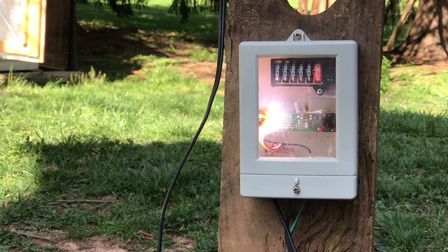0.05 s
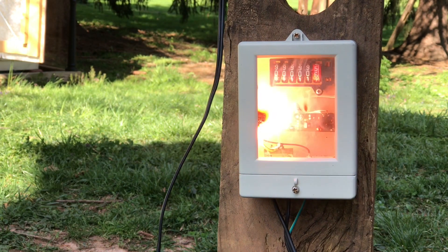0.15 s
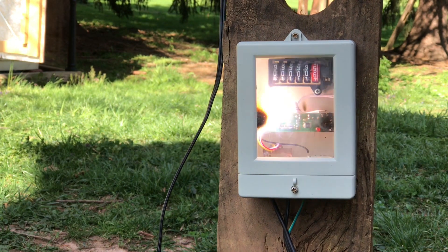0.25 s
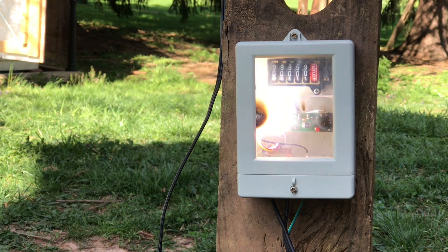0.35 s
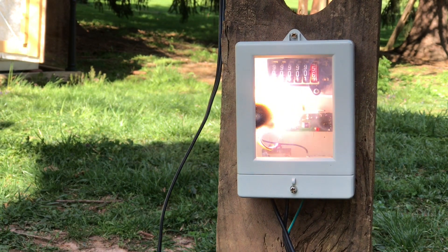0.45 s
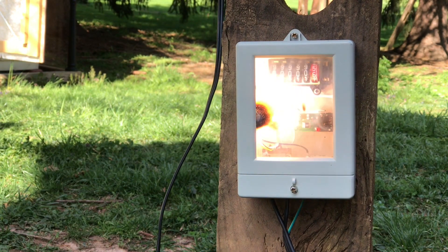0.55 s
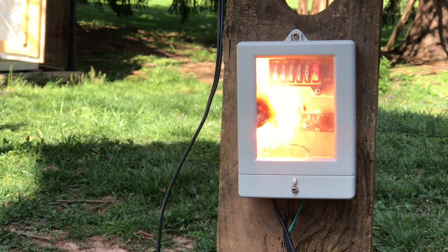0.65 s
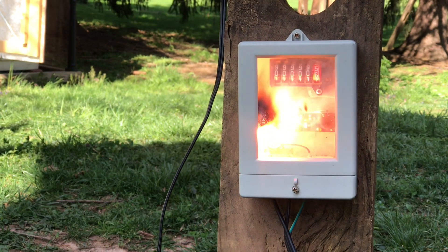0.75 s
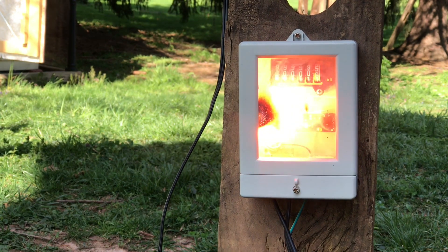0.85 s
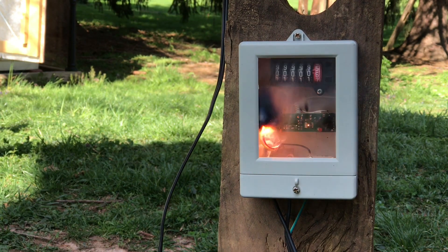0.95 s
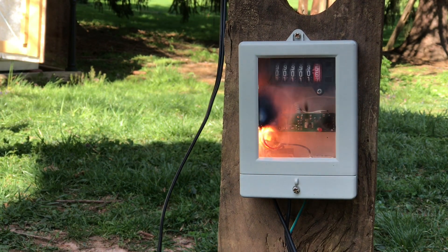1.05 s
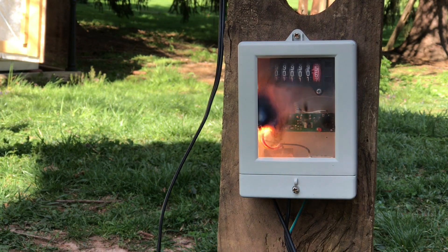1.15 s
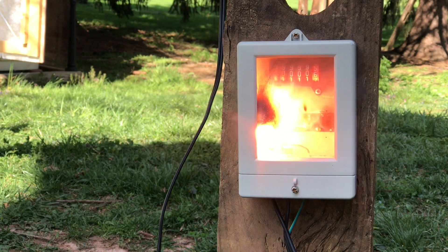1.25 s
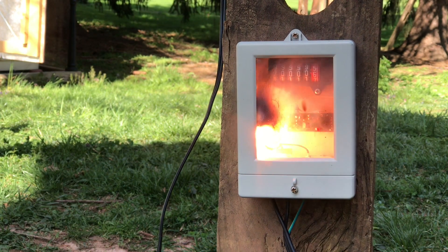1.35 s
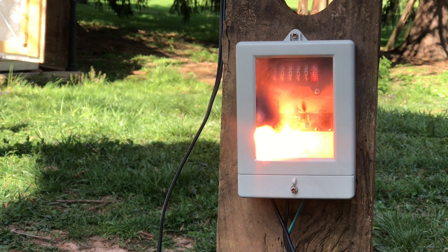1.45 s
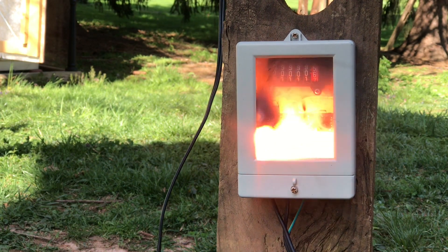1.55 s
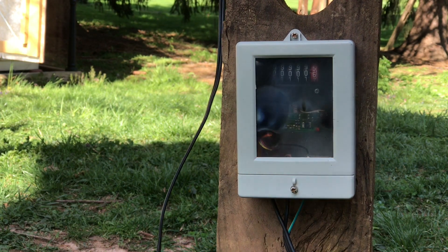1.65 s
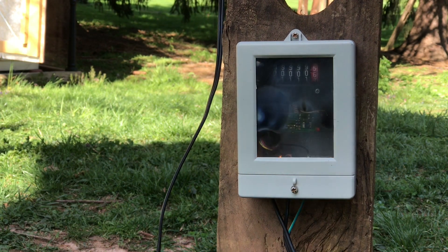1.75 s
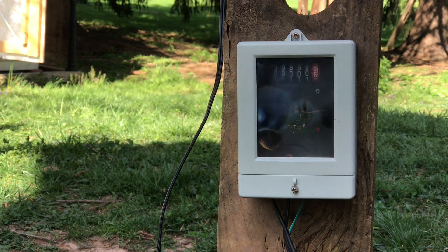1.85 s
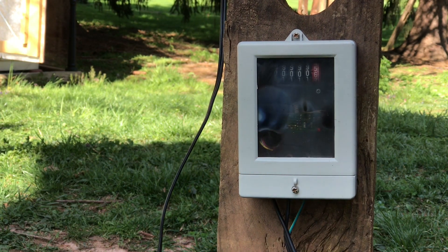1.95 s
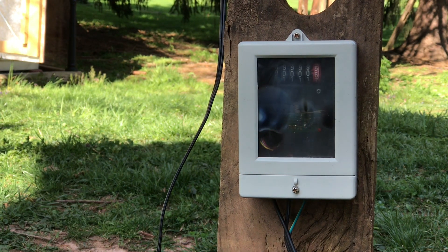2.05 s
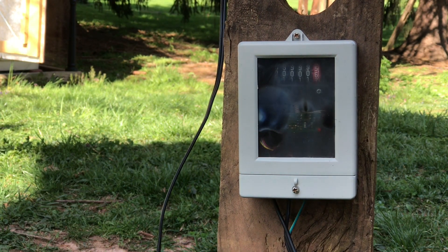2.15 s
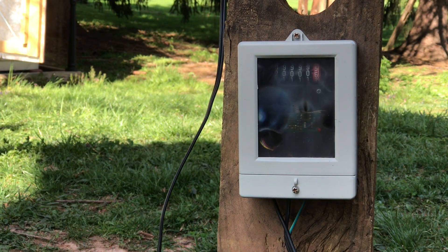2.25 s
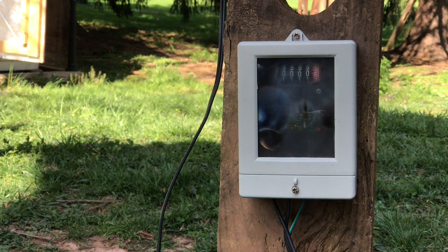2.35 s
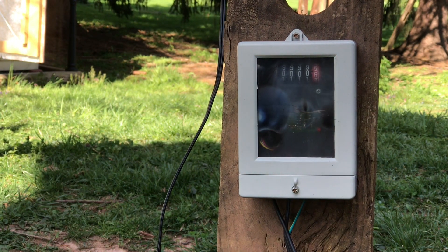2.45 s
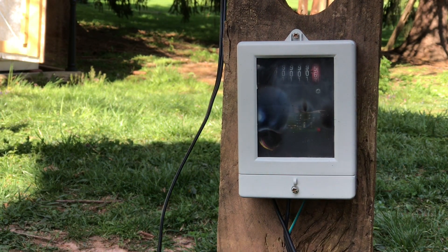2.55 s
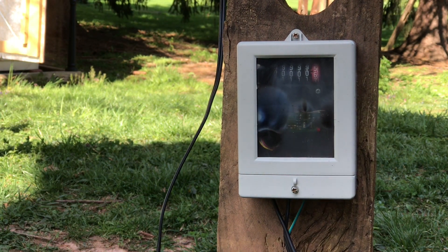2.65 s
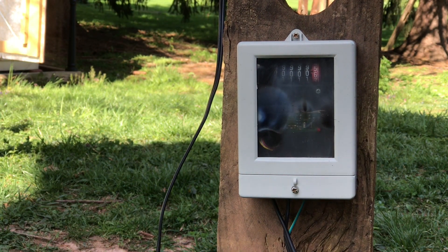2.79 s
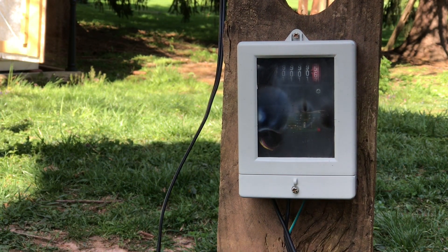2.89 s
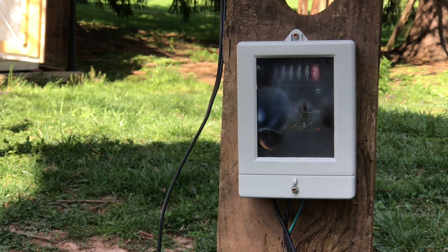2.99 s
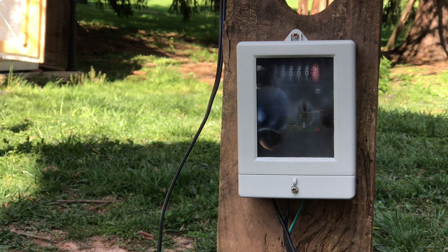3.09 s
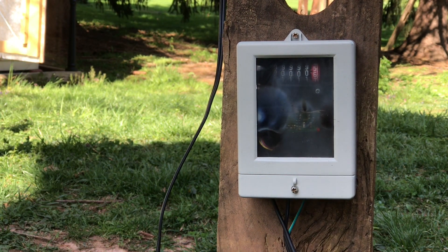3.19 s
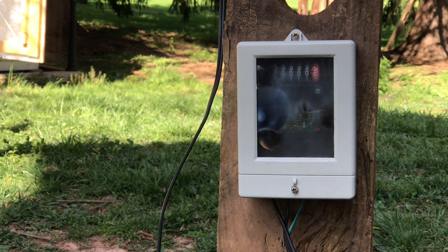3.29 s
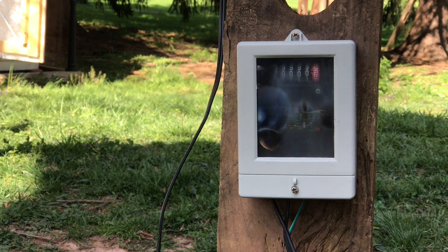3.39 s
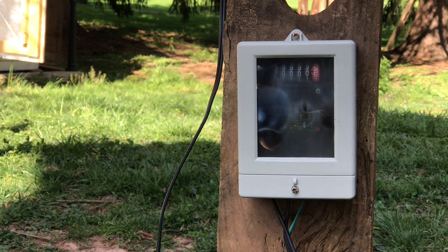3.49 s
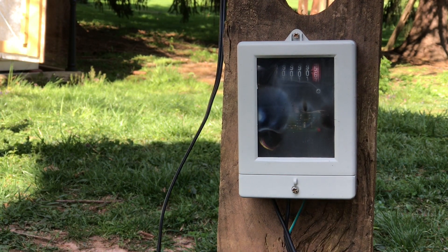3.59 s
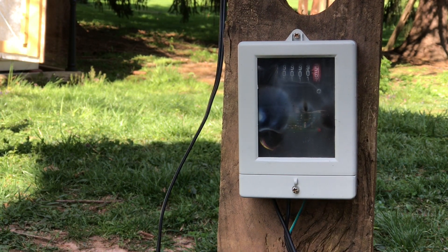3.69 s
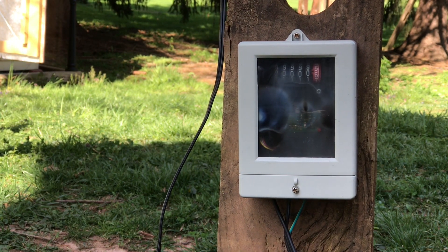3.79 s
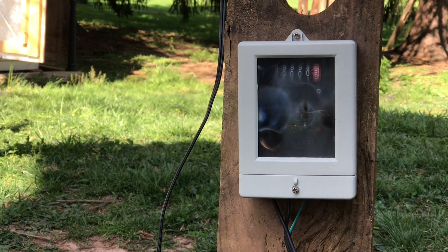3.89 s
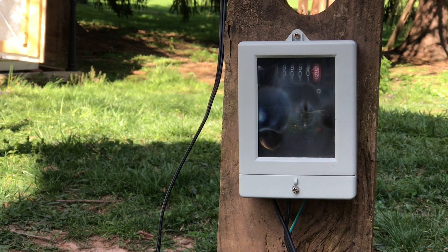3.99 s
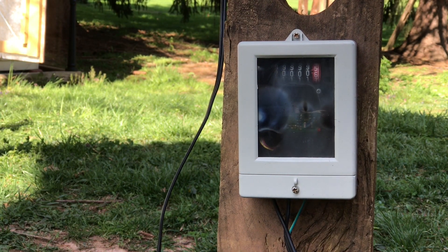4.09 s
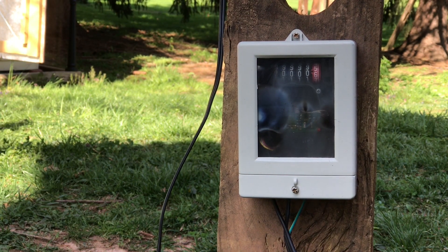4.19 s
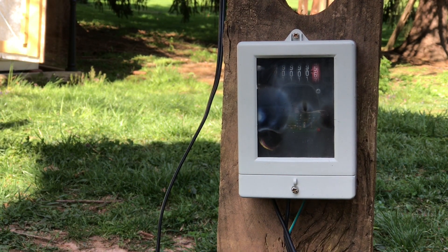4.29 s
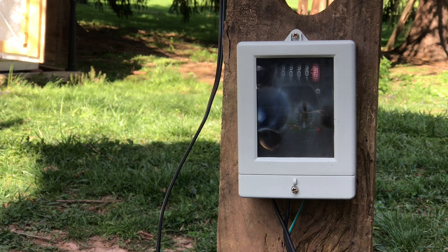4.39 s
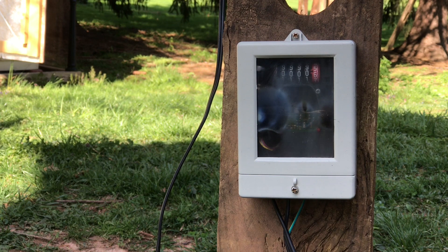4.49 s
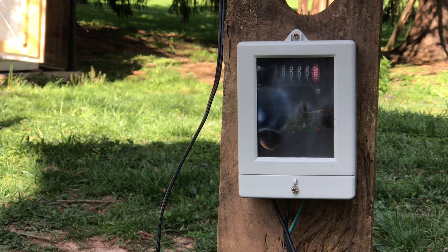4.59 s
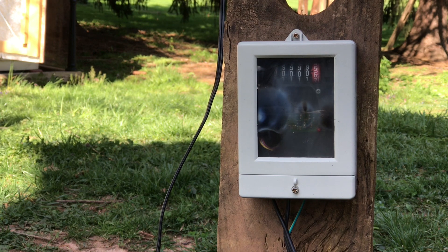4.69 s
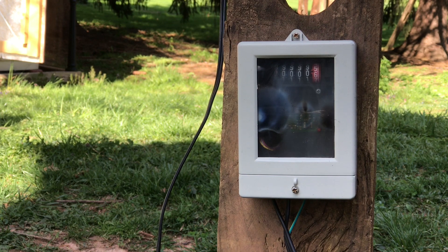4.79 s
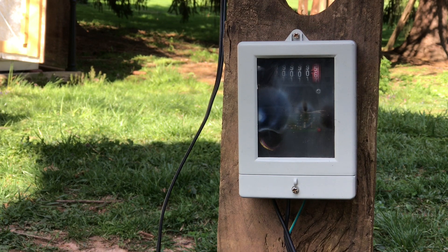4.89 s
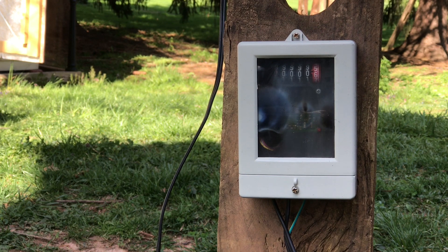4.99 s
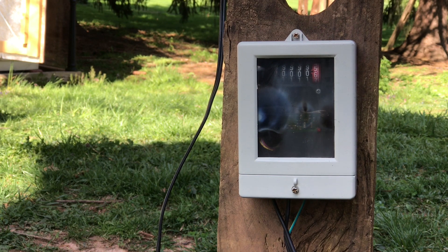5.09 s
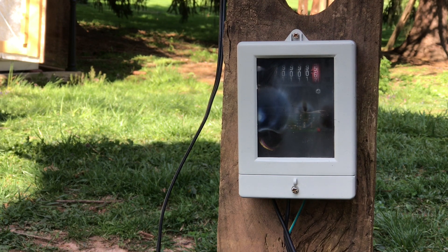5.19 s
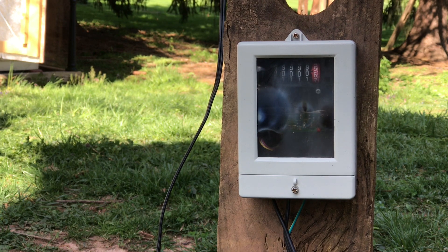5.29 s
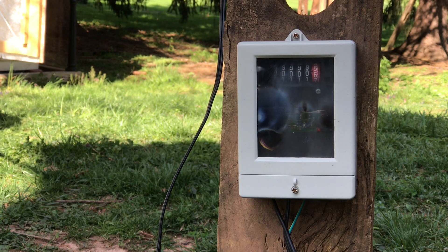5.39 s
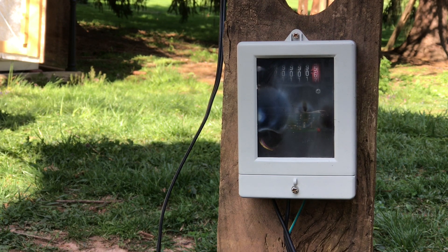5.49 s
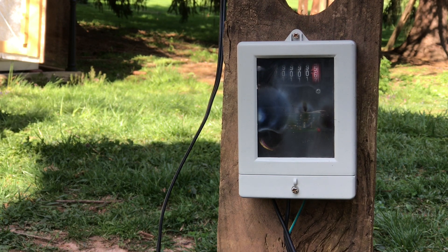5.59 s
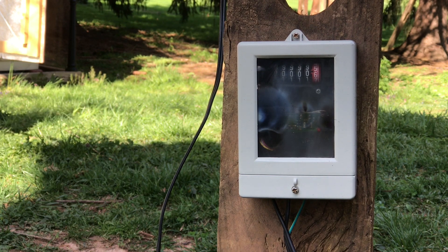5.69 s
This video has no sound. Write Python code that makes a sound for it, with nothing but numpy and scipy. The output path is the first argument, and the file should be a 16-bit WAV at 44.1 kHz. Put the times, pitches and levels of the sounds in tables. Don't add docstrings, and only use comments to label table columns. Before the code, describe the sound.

Close up in an open yard, an electricity meter burns inside its plastic box: a rough low buzz, bright sizzle, spitting crackles and small gas thumps, surging unevenly. After about a second and a half it dies abruptly. Cooling plastic then ticks and cracks irregularly, with one loud snap near the middle. Light wind rumbles on the microphone over steady faint hiss, with a slight scattered outdoor echo.

```python
import sys
import numpy as np
from scipy import signal
from scipy.fft import rfft, irfft, next_fast_len
from scipy.io import wavfile
from scipy.ndimage import map_coordinates

SR = 44100
rng = np.random.default_rng(int(sys.argv[2]) if len(sys.argv) > 2 else 0)


def elevation(decibels):
    levels = np.asarray(decibels, float)
    return 10 ** (levels / 20)


def digitize_waveform(pressure):
    field = np.atleast_2d(pressure).T
    bounded = np.clip(field, -1, 1)
    quanta = np.round(bounded * 32767).astype(np.int16)
    wavfile.write(sys.argv[1], SR, quanta)


N = 253134
TIME = np.arange(N) / SR

STRIKE_HZ = 119.85
STRIKE_S = 0.3295
TURNS = (TIME - STRIKE_S) * STRIKE_HZ


def unit(x):
    return x / np.sqrt(np.mean(x ** 2) + 1e-20)


def along(points, hz):
    f, v = np.transpose(points)
    return np.interp(np.log(hz + 1), np.log(f + 1), v)


def curves(rows):
    s, *columns = np.transpose(rows)
    return [np.interp(TIME, s, column) for column in columns]


def wobble(rate):
    knots = rng.standard_normal(int(N * rate / SR) + 4)
    return map_coordinates(knots, [np.arange(N) * rate / SR])


def filtered(x, response):
    m = 2 * next_fast_len(len(x) // 2 + SR // 4)
    h = response(np.fft.rfftfreq(m, 1 / SR))
    h = h / np.sqrt(np.mean(abs(h) ** 2))
    return irfft(rfft(x, m) * h, m)[:len(x)]


def ringing(modes):
    def response(f):
        total = 0
        for k, (centre, width, db) in enumerate(modes):
            damping = 1j * f * width
            total = total + (-1) ** k * elevation(db) * damping / (centre ** 2 - f * f + damping)
        return total
    return response


def rush(spectrum):
    return unit(filtered(rng.standard_normal(N), lambda hz: elevation(along(spectrum, hz))))


def dying(s, t60):
    return [(at, t60) for at in s]


def bursts(rows, db, click, hz=None, sharp=1):
    out, t = np.zeros(N + SR), np.arange(SR // 4) / SR
    for k, row in enumerate(rows):
        t60 = max(row[-1], 0.004)
        burst = elevation(-60 * t / t60) * rng.standard_normal(len(t))
        burst[0] -= click
        if hz is not None:
            burst = signal.lfilter(*signal.iirpeak(hz[k], sharp, SR), burst)
            burst *= np.sqrt(sharp * SR / hz[k] / np.pi)
        out[round(row[0] * SR):][:len(t)] += elevation(db[k]) * burst
    return out[:N]


def wandering(x, modes, wander_db):
    n = 2 * SR
    hz, width, db = np.transpose(modes)
    share = elevation(db) * np.sqrt(width)
    share = share / np.linalg.norm(share)
    rings = np.zeros(n)
    for k, mode in enumerate(modes):
        swell = elevation(wander_db * wobble(16.21)[:n])
        rings += (-1) ** k * share[k] * swell * filtered(x[:n], ringing([mode]))
    return np.pad(rings, (0, N - n))


def strike_jolts():
    lead_s = 0.0028
    beats = STRIKE_S - lead_s + np.arange(-39, 170) / STRIKE_HZ
    luck = rng.standard_normal((len(beats), 2))
    at = np.round((beats + 0.00006 * luck[:, 0]) * SR).astype(int)
    jolts = np.bincount(np.clip(at, 0, N - 1), -elevation(0.56 * luck[:, 1]), N)
    return jolts / np.sqrt(STRIKE_HZ / SR)


def glow(depth):
    flare = np.exp(-((TURNS + 0.66) % 1) / 3.2)
    return unit((1 - depth + depth * flare) * rng.standard_normal(N))


def mains_hum(buzz_db, lit):
    # (multiple, level [dB])
    harmonics = [(1, 7), (2, 4.5), (3, -6)]
    hum = np.zeros(N)
    for k, db in harmonics:
        hum -= elevation(db + 1.5 * wobble(14.1)) * np.cos(2 * np.pi * k * TURNS)
    return elevation(np.minimum(-52.5, buzz_db - 3)) * lit * hum


def box_buzz(buzz_db, lit, jolts):
    # (centre [Hz], width [Hz], level [dB])
    cavity = [(246, 270, -12.5), (349.7, 44, -8.5), (513, 47, -5), (690, 258, -4.5), (831, 277, -1.5),
              (885, 170, -6.5), (887, 49, -18)]
    rough = np.clip(0.31 + 0.12 * wobble(8.9), 0, 1)
    uneven_db = 1.6 * wobble(25.12)
    source = np.sqrt(1 - rough) * jolts + np.sqrt(rough) * glow(0.27)
    buzz = elevation(buzz_db + 2.5 + uneven_db) * lit * source
    box = filtered(wandering(buzz, cavity, wander_db=0.55), lambda f: 1 / (1 + 1j * f / 1100) ** 2)
    return box * np.std(buzz) / np.std(box)


def spits():
    # (time [s], peak [dB], spray over peak [dB])
    single = [(0.0464, -33.5, -7.5), (0.0536, -23, -9.5), (0.0743, -43, -7), (0.082, -31, -15),
              (0.1332, -35.5, -30), (0.255, -36, -16.5), (0.3238, -58, 0), (0.505, -36.5, -15),
              (0.5549, -33.5, 4.5), (0.563, -32.5, -13), (0.5718, -42.5, 8), (0.579, -27.5, -16),
              (0.593, -45, -7), (0.599, -47, -1), (0.6074, -45, -3), (0.6135, -39, -5), (0.68, -46, -5),
              (0.7827, -40, -31), (0.8376, -42.5, -9), (0.865, -45, -13), (0.956, -20, -13),
              (0.964, -22, -6), (0.975, -42, -14), (0.9828, -30, -17), (0.991, -32.5, -6.5),
              (1.2896, -38, -27), (1.3043, -35, -20), (1.31, -37, -25), (1.316, -39, -25),
              (1.4295, -42.5, -0.5), (1.5895, -45, -24), (1.5988, -39.5, -30)]
    sputter = [(0.6214 + k / STRIKE_HZ, -34.5 - 2 * (k == 0), -5 - 2 * k) for k in range(6)]
    return np.transpose(single + sputter)


SPIT_T60 = 0.03


def sizzling(sizzle_db, lit, jolts, spit_s, spit_db):
    # (time [s], peak [dB])
    hard_strikes = [(0.1587, -44), (0.181, -52), (0.2245, -46), (0.334, -51), (0.4146, -53), (0.4316, -47),
                    (0.5278, -48), (0.6883, -51), (0.71, -56), (0.7252, -51), (0.75, -48), (0.7676, -43),
                    (0.818, -51), (0.8313, -47), (0.8493, -47), (0.8828, -43), (0.8998, -45), (0.93, -50),
                    (0.947, -50), (1.083, -54), (1.183, -51), (1.198, -47), (1.2328, -55), (1.2697, -57),
                    (1.376, -48), (1.45, -48), (1.5326, -62.5), (1.61, -54)]
    flicker_db = 2.2 * wobble(45)
    sizzle = elevation(sizzle_db - 1.5 + flicker_db) * lit * (glow(1.0) + 0.47 * jolts)
    sizzle += bursts(dying(spit_s, SPIT_T60), spit_db - 12.0, click=1.5)
    s, db = np.transpose(hard_strikes)
    return sizzle + bursts(dying(s, 0.012), db - 4.5, click=2.9)


def panel_rings(sizzle):
    # (centre [Hz], width [Hz], level [dB])
    cool = [(1290, 156, 4), (1840, 69, -2), (3055, 45, 2), (3400, 46, -4.5), (3858, 145, 10.5),
            (4320, 60, -1), (4700, 85, -1), (5470, 110, -0.5), (5800, 70, -2), (6600, 63, -10),
            (6860, 170, -26), (7930, 87, -12), (8900, 150, -8.5), (10170, 160, -9)]
    # (centre [Hz], width [Hz], level [dB])
    softened = [(1310, 70, 2), (1810, 38, 1), (2170, 550, -15.5), (3130, 56, -7), (3500, 57, -1),
                (3943, 60, 6), (4500, 72, -1.5), (4900, 110, -7), (5630, 150, -2.5), (6590, 60, -7),
                (7200, 110, -18), (8100, 190, -14), (8850, 80, -15), (10400, 490, -11)]
    heat = np.clip((TIME - 0.98) / 0.11, 0, 1)
    panels = wandering(sizzle * (1 - heat), cool, wander_db=1.3)
    panels += wandering(sizzle * heat, softened, wander_db=1.5)
    bend = np.arange(N) + 0.0004 * SR * wobble(5)
    return map_coordinates(panels, [bend], mode="nearest")


def gas_pops():
    # (time [s], peak [dB])
    puffs = [(0.0458, -35), (0.0624, -36), (0.0727, -36), (0.0825, -39), (0.3254, -34.5), (0.5033, -36),
             (0.5546, -33), (0.5787, -42), (0.6214, -39), (0.6374, -37), (0.6631, -37.5), (0.7487, -33),
             (0.7835, -36), (0.803, -37), (0.833, -31.5), (0.9556, -20), (0.9718, -28), (0.9826, -27),
             (1.27, -43), (1.29, -42), (1.3022, -30), (1.381, -35), (1.4315, -36.5), (1.5892, -31),
             (1.5985, -32), (1.608, -35)]
    # (centre [Hz], width [Hz], level [dB])
    thump = [(220, 106, -3), (537, 60, -4), (662, 80, 0.5), (1300, 490, -20.5)]

    def response(f):
        push = elevation(-4) * ringing([(380, 900, 0)])(f)
        return (ringing(thump)(f) + push) / (1 + 1j * f / 1700) ** 3

    s, db = np.transpose(puffs)
    return filtered(bursts(dying(s, 0.036), db - 13, click=18.8), response)


def droplets(sizzle_db, lit, spit_s, spray_db):
    # (centre [Hz], width [Hz], level [dB])
    patter = [(4720, 160, 2), (5770, 490, 0), (7400, 290, 3), (8000, 2600, -2), (11400, 2400, -0.5),
              (14300, 2300, -0.5)]
    # (centre [Hz], width [Hz], level [dB])
    glass = [(7160, 320, -2), (8230, 74, -2), (9030, 31, -4), (10900, 60, -7), (11800, 95, -4),
             (12500, 79, -8), (13500, 41, -4), (14400, 130, 2), (15200, 67, 0)]
    steady_db = -73 + 0.28 * (sizzle_db + 57.5)
    spray = elevation(steady_db + 4.0 + 2.9 * wobble(59.3)) * lit * glow(0.17)
    spray += bursts(dying(spit_s, SPIT_T60), spray_db - 4.0, click=0.52)
    spray += bursts(dying(spit_s, 0.14), spray_db - 13.5, click=0)
    return filtered(spray, lambda f: ringing(patter)(f) * (1 + elevation(-6) * abs(ringing(glass)(f))))


def arc():
    # (time [s], arc power [dB], burning [dB])
    first_burn = [
        (0.0, -46, -51.5),
        (0.12, -53.5, -58),
        (0.31, -46.5, -59),
        (0.5, -49, -59),
        (0.56, -46, -53),
        (0.72, -52.5, -63.5),
        (0.93, -52, -60.5),
        (0.97, -43.5, -49),
        (1.01, -66, -62),
    ]
    # (time [s], arc power [dB], burning [dB])
    second_burn = [
        (1.1, -60, -67.5),
        (1.19, -66.5, -67),
        (1.305, -50.5, -55.5),
        (1.33, -53, -58.5),
        (1.48, -50.5, -53.5),
        (1.57, -50, -60.5),
        (1.609, -47, -65),
        (1.66, -72, -76),
    ]
    buzz_db, sizzle_db = curves(first_burn + second_burn)
    lit = np.clip((second_burn[-1][0] - TIME) / 0.033, 0, 1)
    jolts = strike_jolts()
    spit_s, spit_db, spray_db = spits()
    sizzle = sizzling(sizzle_db, lit, jolts, spit_s, spit_db)
    body = gas_pops() + box_buzz(buzz_db, lit, jolts) + panel_rings(sizzle)

    def gap(f):
        return (1090 ** 2 - f * f + 110j * f) / (1090 ** 2 - f * f + 330j * f)

    spray = droplets(sizzle_db, lit, spit_s, spit_db + spray_db)
    return mains_hum(buzz_db, lit) + filtered(body, gap) + spray


def gusts():
    # (time [s], peak [dB], swing [Hz])
    eddies = [(0.043, -39.5, 120.4), (0.722, -38, 45), (0.743, -38.5, 76.6), (1.036, -42.5, 84.5),
              (1.096, -42, 60.7), (1.245, -36.5, 77.4), (1.757, -40, 43.8), (1.785, -43, 86),
              (2.144, -41.5, 67), (2.189, -39, 70.6), (3.019, -43, 46), (3.189, -40.5, 93),
              (3.378, -37.5, 98), (3.392, -40, 77), (3.777, -42.5, 105), (3.83, -34, 42.6),
              (3.872, -40, 69.4)]
    push_s, flap_db = 0.046, -14.5
    out = np.zeros(N + SR)
    flap = rush([(60, -94), (130, 2.5), (200, -4), (350, -16.0), (500, -28), (900, -92)])
    u = np.linspace(0, 1, round(push_s * SR))
    swell = np.sin(np.pi * u ** 0.71)
    for s, db, hz in eddies:
        swing = 2 * np.pi * hz * push_s * (u - 0.082 * u ** 2)
        at = round(s * SR) - round(0.00836 * SR)
        out[at:at + len(u)] += elevation(db) * swell * (np.sin(swing) + elevation(flap_db) * flap[at:at + len(u)])
    return out[:N]


def wind():
    # (time [s], level [dB])
    strength = [(0.0, -51.5), (0.08, -51), (0.37, -60.5), (0.64, -57.5), (0.82, -55), (1.44, -58),
                (1.82, -56), (1.97, -61), (2.33, -59.5), (2.57, -59), (3.24, -55.5), (3.32, -51.5),
                (3.47, -53), (3.6, -59), (4.28, -57.5), (5.12, -61.5), (5.37, -60.5), (5.74, -62.5)]
    # (frequency [Hz], density [dB per Hz])
    rumble_tone = [(11, -95), (20, -16), (34, 0), (48, 0), (58, -6), (75, -21.5), (130, -120)]
    # (frequency [Hz], density [dB per Hz])
    throb_tone = [(25, -120), (40, -27), (60, 9), (75, 2.5), (100, 7), (130, -3), (200, -34), (400, -120)]
    # (frequency [Hz], density [dB per Hz])
    flutter_tone = [(40, -120), (80, -63), (120, -4.5), (160, -6), (250, -11), (350, -20), (500, -28),
                    (1000, -120)]
    strength_db, = curves(strength)
    mean_db, lumps = strength_db.mean(), wobble(22)
    swing_db = strength_db - mean_db
    rumble_db = swing_db + 2.5 + 1.4 * wobble(3.7)
    throb_db = 0.52 * swing_db - 0.5 + 0.54 * wobble(4.2) + 0.47 * lumps
    flutter_db = 0.27 * swing_db - 5 + 1.6 * wobble(5.03) + 0.72 * lumps
    blow = elevation(rumble_db) * rush(rumble_tone)
    blow += elevation(throb_db) * rush(throb_tone)
    blow += elevation(flutter_db) * rush(flutter_tone)
    return gusts() + elevation(mean_db) * blow


def microphone_hiss():
    # (frequency [Hz], density [dB per Hz])
    hiss_tone = [(150, -33), (240, -15), (300, -6.5), (385, -14), (809, -9.5), (2320, -19.5), (12400, -24),
                 (15500, -24.5)]
    return elevation(-67.5 + 0.027 * wobble(6.1)) * rush(hiss_tone)


def shell_cracks():
    # (time [s], peak [dB], lid [dB], snap [dB], t60 [s])
    slips = [(1.5785, -47, -18, -29, 0.14), (1.6045, -36.5, -5.5, -41.5, 0.048),
             (1.6115, -45, -9, -40, 0.1), (1.6744, -60, -13, -12, 0.06), (2.2343, -63.5, -9, -15, 0.14),
             (2.3795, -62.5, 0, -5, 0.26), (2.649, -60, -2.5, -20, 0.32), (2.7163, -56.5, 9, -15, 0.1),
             (2.9098, -25, -19, -45, 0.043), (2.9168, -41, -12, -40, 0.042), (2.9232, -49, -9, -30, 0.04),
             (2.9364, -42, -8.5, -14, 0.026), (3.1842, -55.5, 7, -25, 0.055), (3.2739, -61, 12, -11, 0.04),
             (3.2927, -51, -12, 4.5, 0.12), (3.6128, -45.5, -11.5, -8, 0.092), (3.7845, -67, -5, -8, 0.028),
             (3.903, -59, 0.5, 3, 0.14), (3.9524, -61.5, -4, -4, 0.084), (4.2712, -62, -6, -5, 0.065),
             (4.5474, -75, -20, 19, 0.04), (5.3514, -64.5, 17, -7, 0.014), (5.3936, -62, -25, -14, 0.04),
             (5.5283, -54.5, -4, -10, 0.016)]
    # (centre [Hz], width [Hz], level [dB])
    shell_modes = [(1955, 560, 5.5), (2410, 450, 12), (2735, 540, 7), (3130, 920, -13)]
    lid_modes = [(361, 170, 0.5), (545, 110, 1), (629, 74, 7.5), (870, 520, -1.5), (1060, 180, 1.5)]
    snap_modes = [(9000, 3000, -12), (12500, 530, 7), (14600, 3700, -4)]
    s, db, lid_db, snap_db, t60 = np.transpose(slips)
    slip_hz = np.full(len(s), 2270)
    shell = bursts(slips, db - 19.5, click=20.3, hz=slip_hz, sharp=1.33)
    shell = filtered(shell, lambda f: ringing(shell_modes)(f) / (1 + 1j * f / 4000) ** 2)
    lid = filtered(bursts(slips, db + lid_db + 0.5, click=9.8), ringing(lid_modes))
    snap = filtered(bursts(slips, db + snap_db - 8.5, click=2.4), ringing(snap_modes))
    return shell + lid + snap


def board_rings():
    # (time [s], peak [dB], pitch [Hz])
    rings = [(1.604, -45.5, 1460), (1.6723, -56.5, 1130), (2.2347, -58, 1060), (2.3827, -60.5, 1500),
             (2.9141, -43.5, 1420), (2.92, -56, 1560), (2.939, -60, 1950), (2.984, -70, 1950),
             (3.273, -65, 1030), (3.2924, -55, 1290), (3.6114, -50.5, 1810), (3.9046, -56, 1510),
             (3.9525, -64, 1140), (4.2737, -68, 1300), (4.283, -57.5, 1150), (2.382, -56, 1060),
             (5.555, -62, 960)]
    # (time [s], peak [dB])
    knocks = [
        (2.243, -57),
        (2.7165, -47),
        (2.7205, -46.5),
        (2.914, -41),
        (2.936, -55),
        (3.186, -44),
        (3.297, -47),
        (3.616, -55.5),
        (3.905, -51),
    ]
    # (time [s], peak [dB], pitch [Hz], t60 [s])
    chimes = [
        (2.717, -51, 1370, 0.2),
        (2.7346, -57, 1360, 0.16),
        (3.1845, -48, 1414, 0.07),
        (3.2112, -51, 1370, 0.11),
        (3.9306, -62, 1480, 0.09),
        (4.284, -59, 1200, 0.08),
    ]
    s, db, hz = np.transpose(rings)
    board = bursts(dying(s, 0.092), db - 0.5, click=1.2, hz=hz, sharp=5.5)
    s, db = np.transpose(knocks)
    board += bursts(dying(s, 0.056), db - 5, click=9.7, hz=np.full(len(s), 656), sharp=16)
    s, db, hz, t60 = np.transpose(chimes)
    return board + bursts(chimes, db - 6.5, click=20.0, hz=hz, sharp=45)


def pane_ticks():
    # (time [s], peak [dB], pitch [Hz], t60 [s])
    pings = [(2.2265, -54, 7400, 0.05), (2.235, -47, 3000, 0.05), (2.3792, -34, 5000, 0.044),
             (2.4055, -47, 5800, 0.048), (2.6455, -42, 14300, 0.02), (2.649, -44, 4900, 0.076),
             (2.676, -54, 6000, 0.03), (2.715, -50, 4200, 0.086), (2.7165, -52, 12500, 0.03),
             (2.7175, -52, 2600, 0.04), (2.9103, -64, 3180, 0.034), (2.9364, -59, 3930, 0.043),
             (3.1846, -41, 4400, 0.036), (3.2735, -57, 3180, 0.031), (3.2929, -37, 5100, 0.051),
             (3.2928, -42, 12000, 0.04), (3.3194, -50, 6280, 0.062), (3.6117, -34.5, 6900, 0.14),
             (3.613, -54, 12300, 0.084), (3.785, -57, 3820, 0.036), (3.9038, -44.5, 3370, 0.063),
             (3.9045, -49, 7500, 0.04), (4.272, -49, 3130, 0.11), (4.5486, -51.5, 5660, 0.038),
             (5.3945, -56, 3340, 0.05), (5.529, -50, 3300, 0.064)]
    s, db, hz, t60 = np.transpose(pings)
    return bursts(pings, db - 16.0, click=9, hz=hz, sharp=3.6)


def lead_in():
    crack_s, rise_s = 2.9095, 0.03
    before = crack_s - TIME
    lead_noise = filtered(rng.standard_normal(N), ringing([(1900, 1200, 0)]))
    return elevation(-64 - 10 * abs(before) / rise_s) * (before > 0) * lead_noise


def ground(x):
    late = np.pad(x, (round(0.0038 * SR), 0))[:N]
    return x + elevation(-6.5) * signal.lfilter(*signal.butter(1, 7000, fs=SR), late)


def yard(x):
    # (frequency [Hz], t60 [s])
    decay = [(300, 0.031), (2000, 0.38), (3000, 0.18), (7000, 0.37), (14000, 0.039)]
    hz, t, z = signal.stft(rng.standard_normal(SR // 2), SR, nperseg=256)
    fade = elevation(-60 * t / along(decay, hz)[:, None])
    tail = signal.istft(z * fade, SR, nperseg=256)[1]
    delayed = np.pad(x, (700, 0))
    return signal.fftconvolve(delayed, tail / np.linalg.norm(tail))[:N]


def rustling_trees():
    middle_s, swell_s = 5.08, 0.15
    level_db = -74.5 - ((TIME - middle_s) / swell_s) ** 2 + 4.5 * wobble(9)
    return elevation(level_db) * rush([(1500, -88), (4000, -28), (8000, -11), (12000, -10), (15000, -15)])


def scene():
    fire = arc()
    air = wind() + microphone_hiss()
    cooling = ground(shell_cracks() + board_rings() + pane_ticks() + lead_in())
    echo = yard(elevation(-20.5) * fire + elevation(-17.5) * cooling)
    return (fire + cooling + echo + air + rustling_trees())[None]


def roll_off(x):
    return signal.sosfilt(signal.butter(12, 16820, fs=SR, output="sos"), x)


def record(dry):
    top_hz, leak_db = 15800, -28
    heard = filtered(dry[0], lambda hz: np.where(hz < top_hz, 1, elevation(leak_db))) * elevation(-2.0)
    return roll_off(heard[None])


dry = scene()
out = record(dry)
digitize_waveform(out)
```